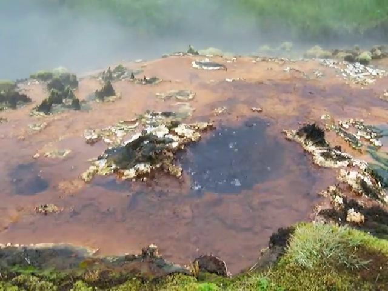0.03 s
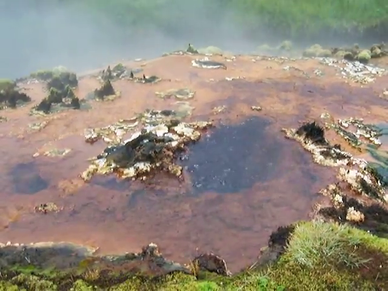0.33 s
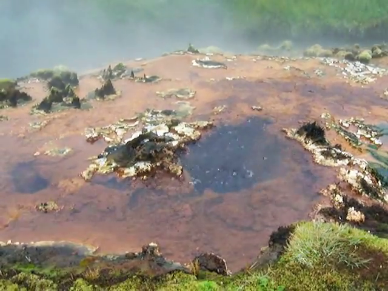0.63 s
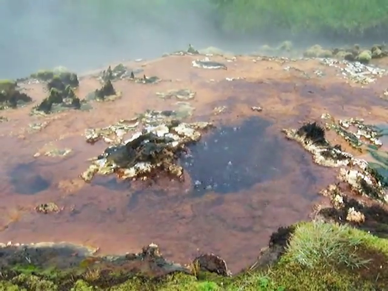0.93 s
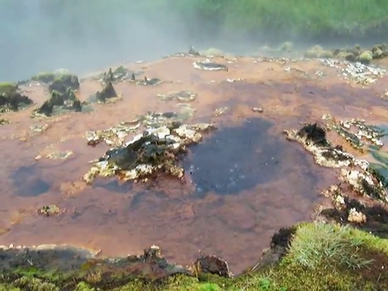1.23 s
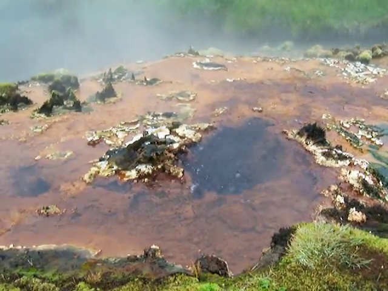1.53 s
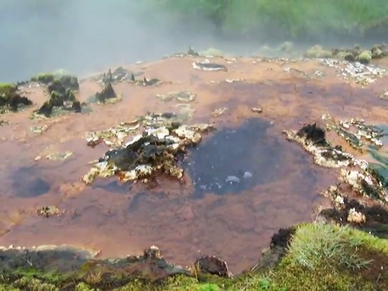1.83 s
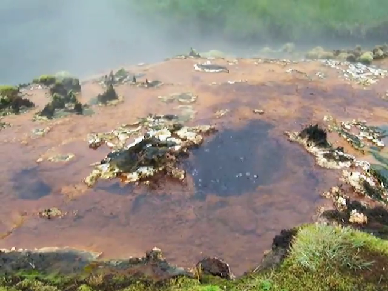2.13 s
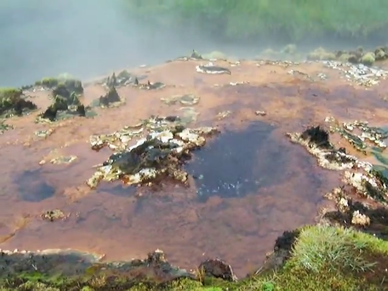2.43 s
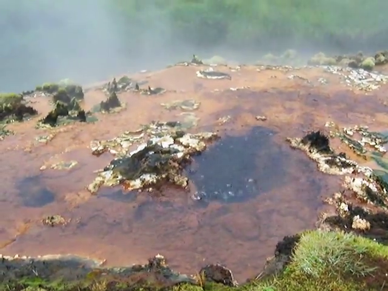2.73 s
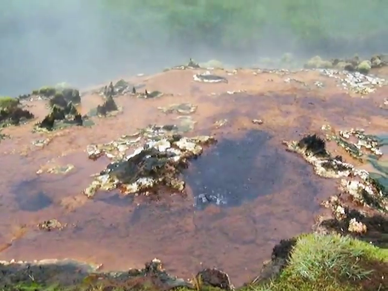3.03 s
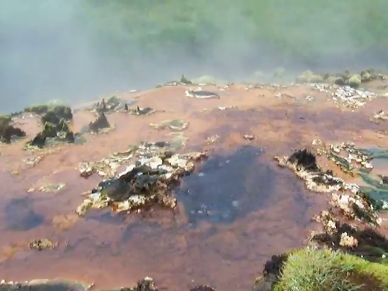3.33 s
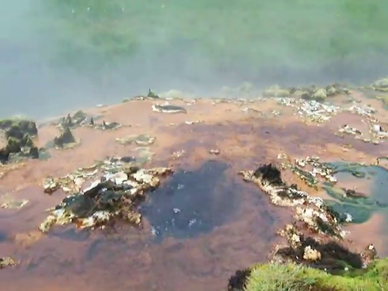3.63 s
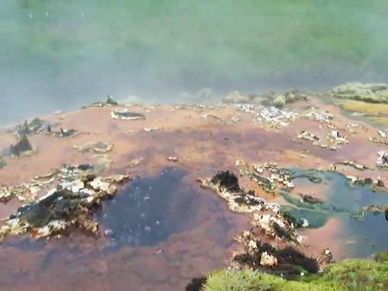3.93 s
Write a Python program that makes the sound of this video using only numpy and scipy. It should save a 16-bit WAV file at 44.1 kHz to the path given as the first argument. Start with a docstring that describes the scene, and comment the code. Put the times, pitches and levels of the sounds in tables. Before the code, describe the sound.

A small hot spring bubbles outdoors for the whole four seconds, with short, bright plips popping irregularly out of a steady gurgling simmer and a soft wash of running water. Low wind rumbles on the microphone, gusting at about 0.9 seconds, from 2.1 to 2.4, and most sharply near 3.7 and 3.9. A faint hiss, hum and thin whine sit underneath throughout.

```python
"""Short, bright plips pop out of the steady simmer of a small hot spring outdoors.
Each plip is a gas bubble: its skin snaps, then the pocket of gas rings with a rising pitch.
Crowds of smaller bubbles gurgle, simmer, spatter and fizz over the wash of running water.
Gusts of wind rumble on the microphone, and the handheld camera adds its own hiss,
a faint hum and a thin, steady whine."""
import sys
import numpy as np
from scipy import signal
from scipy.fft import rfft, irfft
from scipy.io import wavfile
from scipy.ndimage import uniform_filter1d

SR = 44100
rng = np.random.default_rng(int(sys.argv[2]) if len(sys.argv) > 2 else 0)


def wav_record(signal):
    """Record a signal, one row per channel, as 16-bit PCM in the file named by sys.argv[1]."""
    frames = np.transpose(np.atleast_2d(signal))
    bounded = np.clip(frames, -1, 1)
    # unit amplitude maps onto the largest positive 16-bit level
    quanta = np.round(bounded * 32767).astype(np.int16)
    wavfile.write(sys.argv[1], SR, quanta)


N = 176400  # 4 seconds

# The bubbles that stand out. Columns: start_s, pitch_hz, level_db, ring_cycles
BIG_BUBBLES = [(0.0332, 2278, -38.5, 24), (0.1183, 1954, -33, 9), (0.2119, 950, -43, 35),
               (0.2362, 1810, -40.5, 30), (0.367, 980, -48, 28), (0.4255, 1622, -39.0, 23),
               (0.4503, 1610, -40.5, 19), (0.4959, 1050, -38, 33), (0.536, 1310, -42, 45),
               (0.5761, 1714, -33.5, 6), (0.6, 2850, -39, 15), (0.662, 1300, -43.5, 40),
               (0.673, 3120, -38, 10), (0.6863, 1340, -41, 28), (0.7515, 2600, -34, 9),
               (0.7736, 6170, -30, 16), (0.808, 940, -44, 38), (0.8302, 3072, -38, 18),
               (0.8408, 392, -42.5, 26), (0.8992, 1620, -34, 15), (0.9047, 3580, -41, 35),
               (0.972, 3780, -35, 7), (1.1206, 2430, -33, 13), (1.1629, 3487, -32, 9),
               (1.2111, 1830, -32.5, 18), (1.2808, 946, -41, 22), (1.2953, 1110, -36.5, 18),
               (1.375, 1860, -45, 16), (1.5072, 950, -41.5, 24), (1.5489, 1670, -37.5, 33),
               (1.5925, 2850, -38, 13), (1.5929, 2042, -28.5, 19), (1.6159, 1743, -32.5, 26),
               (1.7297, 1550, -33.5, 28), (1.8748, 1925, -34.7, 13), (1.8777, 472, -40, 21),
               (2.1107, 3669, -39.5, 20), (2.1269, 1540, -41.3, 24), (2.138, 2810, -39, 11),
               (2.2385, 1058, -36.5, 14), (2.2631, 6340, -35.5, 20.5), (2.3121, 3639, -37.7, 14),
               (2.3785, 1810, -41.5, 30), (2.6665, 6509, -35.5, 21), (2.7209, 3110, -41.9, 28),
               (2.7353, 865, -40, 22), (2.7705, 1030, -31, 20), (2.7707, 3463, -36, 9),
               (2.7836, 3440, -38.6, 15), (2.803, 2990, -39, 14), (2.9337, 650, -40.5, 20),
               (2.9443, 1450, -32.5, 31), (2.9726, 1022, -36.5, 18), (3.03, 503, -42.5, 21),
               (3.0312, 918, -32, 4), (3.165, 3540, -45, 15), (3.1741, 1814, -46, 35),
               (3.2754, 1906, -37.5, 15), (3.3129, 3760, -39, 30), (3.3215, 1710, -36, 32),
               (3.3743, 7600, -32, 20), (3.388, 3950, -34, 15), (3.4031, 1619, -38, 18),
               (3.5578, 1402, -39.7, 26), (3.571, 463, -32.5, 5), (3.588, 1480, -44, 27),
               (3.61, 1320, -42, 36), (3.6255, 3260, -37, 13), (3.6266, 1721, -34, 10),
               (3.6369, 5219, -35.5, 11), (3.6761, 1160, -52, 28), (3.7071, 1090, -33.5, 14),
               (3.7899, 3500, -32, 10), (3.8531, 4502, -42, 17)]
SNAP_GAIN_DB, RING_GAIN_DB = -10.5, -0.57  # added to each bubble's level
SNAP_DECAY_S, SNAP_WIDTH_OCTAVES, SNAP_PITCH_RATIO = 0.0006, 0.55, 1.24


def plips():
    """A big bubble bursts: its skin tears with a tiny snap of noise, and the gas pocket rings."""
    out = np.zeros(N)
    t = np.arange(SR // 100) / SR
    for start_s, pitch_hz, level_db, ring_cycles in BIG_BUBBLES:
        octaves_away = np.log2(frequencies(len(t)) / (pitch_hz * SNAP_PITCH_RATIO))
        band = np.exp(-.5 * (octaves_away / SNAP_WIDTH_OCTAVES) ** 2)
        snap = irfft(rfft(rng.standard_normal(len(t))) * band, len(t))
        add(out, start_s, set_level(snap, level_db + SNAP_GAIN_DB) * np.exp(-t / SNAP_DECAY_S))
        add(out, start_s, gain(level_db + RING_GAIN_DB) * bubble_ring(pitch_hz, ring_cycles))
    return out


def bubble_ring(pitch_hz, ring_cycles, pitch_rise=0.1, attack_cycles=0.25):
    """A gas pocket rings, fading by 60 dB over ring_cycles; its pitch rises as it opens."""
    cycles = np.arange(int(ring_cycles / pitch_hz * SR) + 2) * pitch_hz / SR
    fade_in = 1 - np.exp(-cycles / attack_cycles)
    fade_out = gain(-60 * cycles / ring_cycles)
    rising_cycles = cycles + pitch_rise * cycles ** 2 / (2 * ring_cycles)
    return fade_in * fade_out * np.sin(2 * np.pi * rising_cycles)


def bubble_crowd(per_s, low_hz, high_hz, ring_cycles, spread_db, level_db):
    """Small bubbles ring at random moments: many are faint, a few are stronger."""
    out = np.zeros(N)
    dice = rng.random((4000, 4))  # four numbers from 0 to 1 for each possible bubble
    for when, pitch, size, length in dice[:int(per_s * N / SR)]:
        pitch_hz = low_hz * (high_hz / low_hz) ** pitch
        size_db = spread_db * min(-np.log(1 - size), 4.2)  # capped, so none gets too loud
        cycles = ring_cycles * np.exp(0.78 * (2 * length - 1))  # about half to double
        add(out, when * N / SR, gain(size_db) * bubble_ring(pitch_hz, cycles))
    return set_level(out, level_db)


# The tone of the water running behind the pool. Columns: frequency_hz, relative_db
WATER_TONE = [(100, 6.5), (250, -3), (430, 0), (700, -4), (1000, -6), (1300, -9.5), (1700, -7),
              (2300, -9.5), (3400, -12.5), (5000, -17), (9000, -20.5)]


def running_water(level_db=-52.5, flicker_db=1.7):
    """Running water makes a wash of noise in which each half-octave band flickers on its own."""
    out = np.zeros(N)
    spectrum = rfft(noise(WATER_TONE))
    half_octaves = 2 * np.log2(frequencies(N) / 100)  # counted up from 100 Hz
    for centre in range(15):
        band = irfft(spectrum * np.maximum(1 - abs(half_octaves - centre), 0), N)
        out += band * gain(flicker_db * wander(steps_per_s=28))
    return set_level(out, level_db)


# The tones of the wind's deep rumble and higher buffeting. Columns: frequency_hz, relative_db
RUMBLE_TONE = [(5, -14), (15, 4), (28, 6.5), (45, -6.5), (60, -5.5), (90, -22), (200, -69.5)]
BUFFET_TONE = [(30, -22.5), (58, 3), (85, -0.5), (120, -3.5), (170, -14), (260, -21), (500, -35),
               (1500, -57)]
# How each of them swells with the gusts. Columns: time_s, level_db
RUMBLE_GUSTS = [(0, -52.5), (.25, -51), (.4, -44.5), (.75, -44.5), (.95, -33.5), (1.05, -45.5),
                (1.25, -41.5), (1.5, -44.5), (1.65, -39), (1.85, -44.5), (2.05, -41.5), (2.15, -34),
                (2.25, -40.5), (2.35, -31.5), (2.47, -40.5), (2.65, -44.5), (2.75, -40.5), (2.95, -40),
                (3.12, -47.5), (3.42, -39), (3.55, -46), (3.7, -33.5), (3.85, -41), (4.0, -40)]
BUFFET_GUSTS = [(0, -51.5), (.4, -54), (.65, -50.5), (.73, -63), (.82, -60), (.87, -40), (.93, -39.5),
                (.98, -48.5), (1.05, -43.5), (1.22, -53.5), (1.45, -54), (1.63, -52), (1.7, -48),
                (1.78, -45), (1.87, -48), (1.93, -49), (2.02, -51), (2.08, -41.5), (2.16, -37),
                (2.23, -43.5), (2.3, -36.5), (2.42, -40), (2.5, -48.5), (2.58, -51), (2.65, -45.5),
                (2.74, -45), (2.78, -52), (2.85, -45.5), (2.95, -50), (3.03, -50), (3.14, -44),
                (3.22, -55.5), (3.42, -44.5), (3.55, -45), (3.62, -54.5), (3.69, -30.5), (3.72, -39),
                (3.77, -50), (3.83, -55), (3.88, -30), (3.93, -45.5), (4.0, -46.5)]


def wind(boost_db=0.5):
    """Wind on the microphone makes a deep rumble, with higher buffeting in the gusts."""
    rumble = swirling_air(RUMBLE_TONE, even_over_s=0.12) * gain(curve(RUMBLE_GUSTS) + boost_db)
    buffet = swirling_air(BUFFET_TONE, even_over_s=0.06) * gain(curve(BUFFET_GUSTS) + boost_db)
    return rumble + buffet


def swirling_air(tone, even_over_s):
    """Swirling air pushes at random: noise, with its strength evened out over a short time."""
    pressure = noise(tone)
    local_power = uniform_filter1d(pressure ** 2, size=int(even_over_s * SR))
    return pressure / np.sqrt(local_power)


# The tones of the camera's soft knock and of its hiss. Columns: frequency_hz, relative_db
KNOCK_TONE = [(60, -26.5), (120, -7), (150, -0.5), (180, -1), (210, -4.5), (240, -4), (270, -9),
              (300, -13.5), (340, -27.5), (430, -14.5), (520, -13.5), (700, -31.5), (2000, -69.5)]
HISS_TONE = [(100, 6.5), (2000, -7.5), (4000, 2.5), (5000, 1.5), (6300, 4), (7300, 2.5), (9000, -1.5)]


def camera_noise(turns_per_s=29.97, whine_hz=6903.3):
    """The camera hisses and whines; a spinning part knocks once a turn, which blurs into a hum."""
    t = np.arange(N) / SR
    whole_turns = np.floor(turns_per_s * t + rng.random())
    knocks = np.diff(whole_turns, append=0).clip(0)
    hum = set_level(shape_tone(knocks - knocks.mean(), KNOCK_TONE), level_db=-54.5)
    whine = set_level(np.sin(2 * np.pi * whine_hz * t), level_db=-62.5)
    hiss = set_level(noise(HISS_TONE), level_db=-58)
    return hiss + hum + whine


def gain(db):
    """Turn decibels into a number to multiply a sound by."""
    return 10 ** (np.asarray(db) / 20)


def set_level(sound, level_db):
    """Scale a sound to an average (rms) level."""
    return sound * gain(level_db) / np.sqrt(np.mean(sound ** 2))


def curve(rows):
    """Join (time_s, value) points with straight lines."""
    times_s, values = np.array(rows).T
    return np.interp(np.arange(N) / SR, times_s, values)


def frequencies(samples):
    """The frequencies in a sound's spectrum, kept at 1 Hz or more so that logs work."""
    return np.maximum(np.fft.rfftfreq(samples, 1 / SR), 1)


def shape_tone(sound, tone):
    """Turn frequencies up or down along a line through (frequency_hz, relative_db) points."""
    hz, db = np.array(tone, float).T
    change_db = np.interp(np.log(frequencies(N)), np.log(hz), db)
    return irfft(rfft(sound) * gain(change_db), N)


def noise(tone):
    """Noise with the given tone and an average (rms) size of 1."""
    return set_level(shape_tone(rng.standard_normal(N), tone), 0)


def wander(steps_per_s):
    """Slide from one random value to the next, with a typical size of 1."""
    step_samples = int(SR / steps_per_s)
    steps = np.repeat(rng.standard_normal(N // step_samples + 2), step_samples)
    return set_level(uniform_filter1d(steps, step_samples)[:N], 0)


def add(out, start_s, sound):
    """Mix a sound into out, starting at start_s."""
    first = int(np.clip(round(start_s * SR), 0, N - 1))
    out[first:first + len(sound)] += sound[:N - first]


# How hard the spring boils. Columns: time_s, relative_db
BOIL_STRENGTH = [(0, -0.5), (.4, -1), (.7, 0.5), (1.0, 0), (1.4, -1.2), (1.55, 0.8), (1.8, -.5), (2.2, 0),
                 (2.6, 0.5), (2.95, 1), (3.3, 1), (3.45, 0.5), (3.58, 2.5), (3.75, 0.5), (4.0, -1)]


def scene():
    """Mix it all: a harder boil swells the simmer and, a little less, the running water."""
    boil_db = curve(BOIL_STRENGTH)
    big_bubbles = plips()
    gurgle = bubble_crowd(106, 274, 742, ring_cycles=20, spread_db=2, level_db=-62.5)
    simmer = bubble_crowd(524.5, 817, 1898, ring_cycles=18, spread_db=2, level_db=-58.5)
    spatter = bubble_crowd(333, 2097.5, 4390.5, ring_cycles=11.5, spread_db=4, level_db=-64.5)
    fizz = bubble_crowd(94, 4399.5, 8007, ring_cycles=17.5, spread_db=3, level_db=-72.5)
    pool = big_bubbles + gurgle + gain(boil_db) * simmer + spatter + fizz
    water = gain(0.75 * boil_db) * running_water()
    return (pool + water + wind() + camera_noise())[None]  # one channel


# How the camera dulls the highest sounds. Columns: frequency_hz, gain_db
CAMERA_TONE = [(20, 1), (7000, -1), (7450, 0.5), (7900, -5), (8400, -11.5), (8800, -24.5), (9100, -33)]
CUTOFF_HZ = 9000


def record(dry):
    """The camera softens the treble and cuts off the very top."""
    dulled = np.array([shape_tone(channel, CAMERA_TONE) for channel in dry])
    low_pass = signal.ellip(8, .1, 70, CUTOFF_HZ, fs=SR, output="sos")
    return signal.sosfilt(low_pass, dulled)


dry = scene()
out = record(dry)
wav_record(out)
```